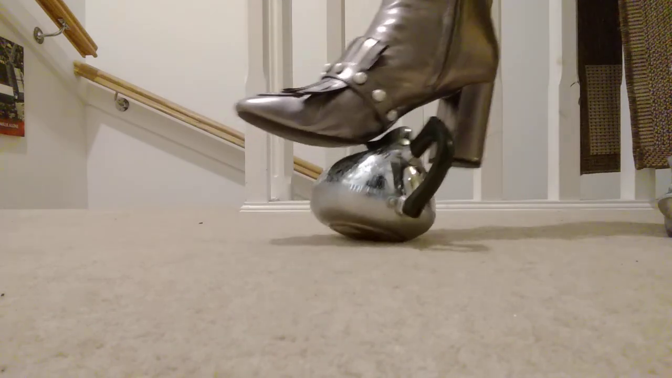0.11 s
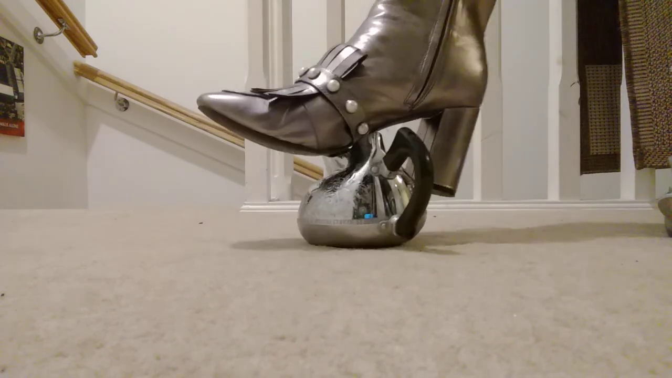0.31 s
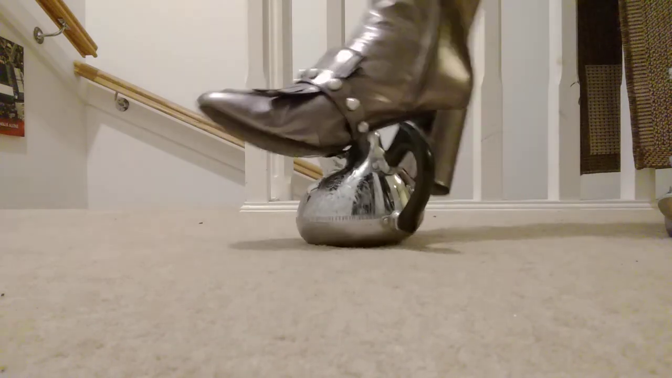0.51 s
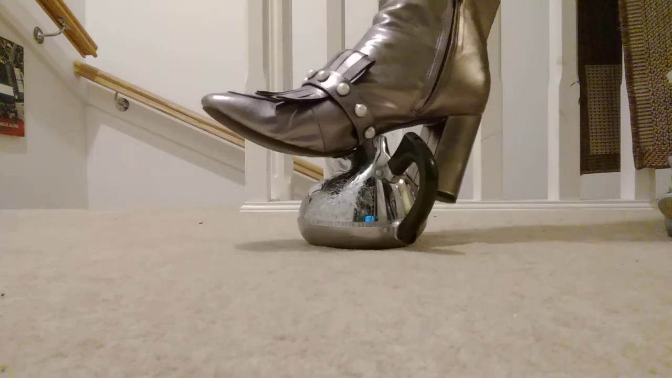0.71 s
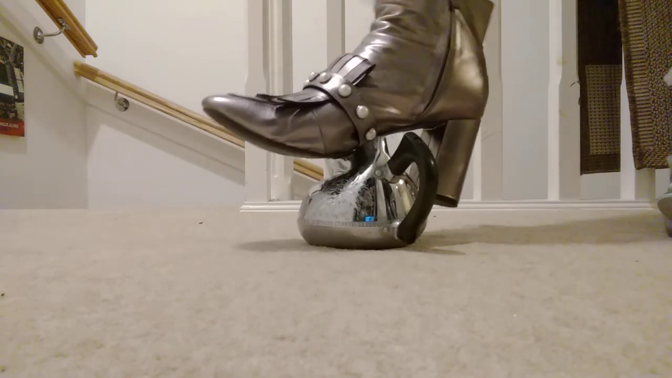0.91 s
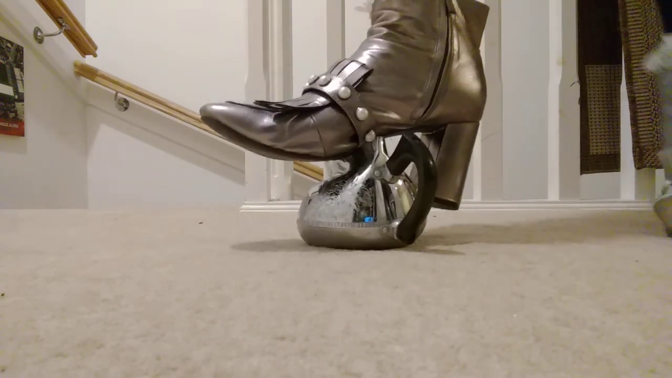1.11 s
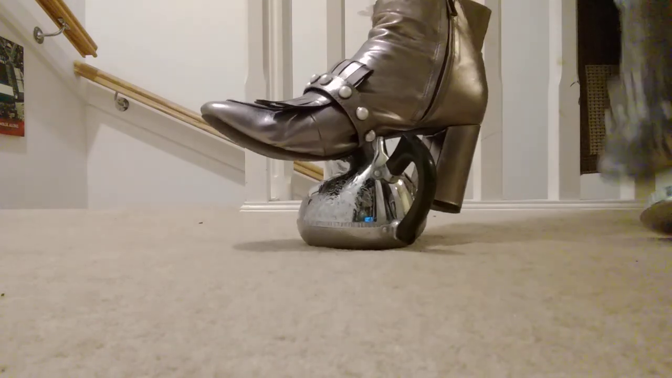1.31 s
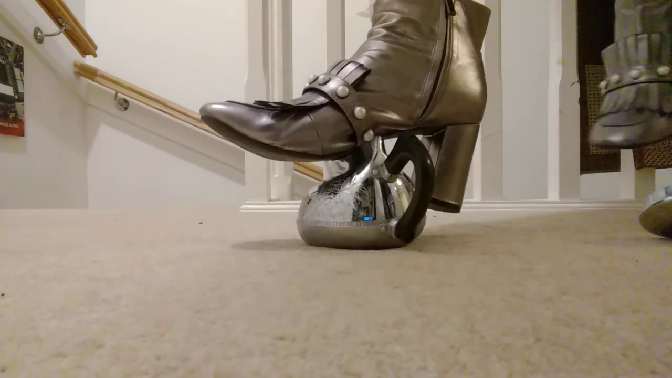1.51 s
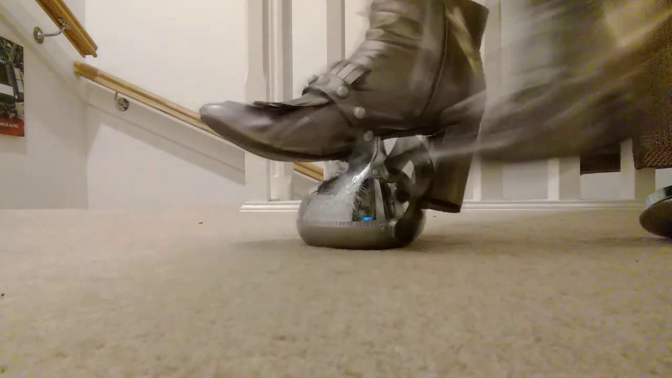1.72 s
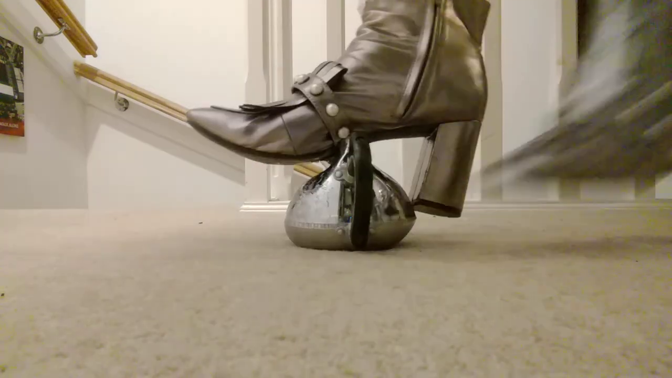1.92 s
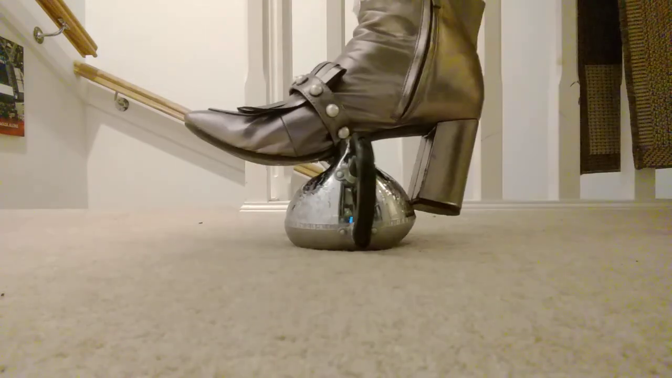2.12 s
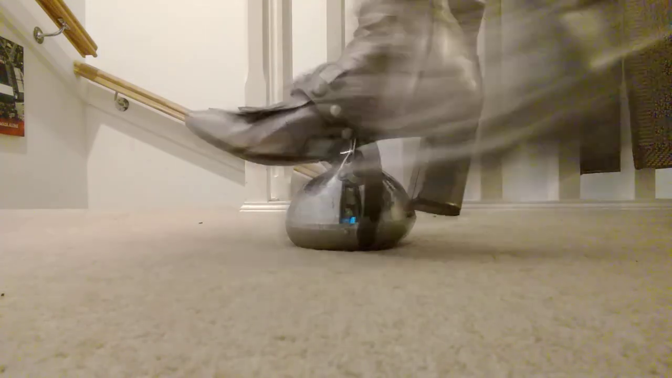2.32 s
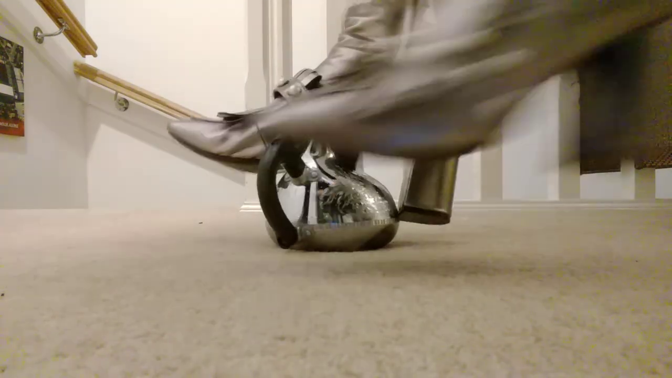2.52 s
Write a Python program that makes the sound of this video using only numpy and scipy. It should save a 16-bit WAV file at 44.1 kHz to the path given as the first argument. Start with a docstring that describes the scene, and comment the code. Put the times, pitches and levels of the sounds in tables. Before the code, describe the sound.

Metallic clank of a boot stamping on a thin steel teapot, then two sharp kicks.

```python
"""Boots on a thin steel teapot

A boot stamps onto a thin steel teapot on a carpeted wooden landing; the other boot kicks it twice.
The pinned pot gives short dull clanks, rattles and rings once: decaying sine modes and noise cracks.
The floor groans under the shifting weight, a sole shuffles, leather scuffs, over hiss: coloured noise.
Two spaced microphone ports low on the carpet pick it up, in a small hallway of sparse random echoes."""
import sys
import numpy as np
from scipy import signal
from scipy.fft import rfft, irfft
from scipy.io import wavfile
from scipy.ndimage import uniform_filter1d

SR = 44100
rng = np.random.default_rng(int(sys.argv[2]) if len(sys.argv) > 2 else 0)


def bounce(signal):
    """Save signal as a 16-bit WAV file at the path given by the first command-line argument."""
    frames = np.transpose(np.atleast_2d(signal))
    limited = np.clip(frames, -1, 1)
    pcm = np.round(limited * 32767).astype(np.int16)
    wavfile.write(sys.argv[1], SR, pcm)


N = 114660

# heavy blows: start_s, level_db, hardness_db_per_octave, crack_db, ring_factor, pitch_factor, thud_lag_s
BLOWS = [(0.2037, -8, -2.5, -4.5, 0.9, 0.947, 0.00066), (1.7147, -4.5, 0.5, -1, 0.7, 1.007, .0055),
         (2.3131, -5, 0.5, -5, 0.7, 1.036, 0.005)]
# light knocks and rattles: start_s, level_db, hardness_db_per_octave, crack_db
TAPS = [(0.1323, -38.5, 6, -3), (0.301, -42.5, 1, -2.5), (0.368, -47, 1.5, -21), (.562, -67, 5, 21),
        (.572, -52, 5, -22), (0.616, -47.5, -8, -26), (1.803, -37.5, -6.5, 3), (1.829, -36.5, -3, -3),
        (1.835, -41.5, -3.5, -11), (1.864, -51.5, 2.8, 5.5), (2.185, -66, -9.5, -31.5)]
# pinned pot and the boards under it, before each blow's factors: pitch_hz, level_db, t60_s
BODY_MODES = [(91, -11.5, 0.18), (146.3, 3, 0.053), (283, 2, 0.03), (357, 6.5, 0.031), (457, 0.5, 0.013),
              (717.4, -4, 0.029), (1129.6, 5.5, 0.0089), (1442, -9, 0.016), (1762, 7.5, 0.0027),
              (2655, -12.5, 0.016), (3680, -22, 0.012)]
# bright noise of steel being struck or scuffed: frequency_hz, level_db
CRACK_SPECTRUM = [(60, -68), (6000, -20), (8500, -18.5), (10500, -4), (12000, 1.5), (13400, -2),
                  (14600, -19.5), (16000, -37)]
# air in the pinned pot, set ringing again and again: start_s, pitch_hz, level_db, t60_s
CAVITY_TONES = [(0.135, 400, -33, 0.13), (.2045, 384.6, -9.5, 0.074), (0.251, 350, -26, 0.045),
                (.314, 356.6, -36.5, 0.15), (0.367, 379, -41, 0.22), (.47, 380.4, -57, 0.5),
                (2.315, 380, -14, .025)]
# a board bending: start_s, pitch_hz, level_db, rise_s, t60_s
CREAKS = [(.778, 150, -43, .03, .4), (.852, 146, -39, .014, .15)]
# freed wall of the pot ringing, before waver and damping: start_s, pitch_hz, level_db, rise_s, t60_s
RIM_TONES = [(1.826, 2100, -51, .006, .07), (1.824, 4619, -55, .03, .1), (1.862, 2040, -51, .008, .05),
             (1.862, 2756, -55, .012, .27), (1.84, 1529, -60, .07, 4.), (1.89, 4619, -58, .03, .15)]
# bass phase of left over right: frequency_hz, phase_radians
BASS_PHASE = [(60, -2.1), (300, -2.2), (450, -.6), (900, .25), (1150, 0)]
# shading of the ports, left minus right: frequency_hz, difference_db
PORT_SHADING = [(150, 6), (400, -2.5), (1200, -2.5), (2500, -0.5), (6000, -2), (13000, -8.5)]
# decay of the hallway: frequency_hz, t60_s
HALL_DECAY = [(60, 0.62), (250, 0.27), (1000, 0.41), (3000, 0.077), (12000, 0.39)]
# colour of the hallway echoes: frequency_hz, level_db
HALL_COLOUR = [(200, -11), (500, -14.5), (1200, -24.5), (3000, -15), (7000, -13.5), (13000, -34)]
# leather scuffing over steel: time_s, level_db
SCUFF_LEVEL = [(.128, -83), (.135, -53), (.23, -43), (.3, -67), (.8, -90), (.86, -53), (.92, -91),
               (1.7, -58), (1.75, -45), (1.79, -95), (1.805, -52), (1.82, -66), (1.861, -52.5),
               (1.899, -83.5), (2.298, -80), (2.321, -38.5), (2.422, -77)]
# sole on carpet, spectrum: frequency_hz, density_db_per_hz
SHUFFLE_SPECTRUM = [(60, -16), (200, -3), (500, -12), (1200, -17.5), (2200, -21), (5000, -38.5)]
# sole on carpet, loudness: time_s, level_db
SHUFFLE_LEVEL = [(.12, -59), (.22, -37.5), (.27, -60), (.33, -66), (.7, -62), (.95, -58.5), (1.06, -54.5),
                 (1.17, -52.5), (1.3, -60.5), (1.68, -62.5), (1.999, -77.5)]
# groaning boards, spectrum: frequency_hz, density_db_per_hz
GROAN_SPECTRUM = [(40, -36.5), (70, -12.5), (95, 1), (145, 0), (200, -9), (380, -18), (900, -39)]
# groaning boards, loudness: time_s, level_db
GROAN_LEVEL = [(0, -53.5), (0.129, -67.5), (0.138, -35.5), (.19, -50), (.45, -60), (.775, -54),
               (0.831, -47), (0.885, -44), (0.901, -63.5), (1.08, -43.5), (1.2, -54), (1.3, -79.5),
               (2, -65)]
# background hiss, spectrum: frequency_hz, density_db_per_hz
HISS_SPECTRUM = [(40, 6), (170, 9.5), (400, -8.5), (1000, -7), (2200, -14), (5000, -12.5), (9500, -13.5),
                 (11500, -5.5), (14300, -7)]
# background hiss, dropping lower after the first kick: time_s, level_db
HISS_LEVEL = [(0, -52.5), (.11, -55.5), (.3, -58), (.79, -58.5), (1.03, -55.5), (1.74, -55.5),
              (1.881, -62.5), (2.11, -65.5)]

BOARDS_HZ = 648  # modes below this arrive late
SWELL_CYCLES = 0.89  # cycles that a mode takes to build up
CRACK_RISE_S, CRACK_T60_S = .0006, .007
CRACK_TAIL_DB, CRACK_TAIL_T60_S = -19, .035
TAP_RING_FACTOR = 0.83
# dented steel settling after a blow
RATTLE_COUNT, RATTLE_S, RATTLE_CRACK_DB = 14, .16, -19.5
RATTLE_DB, RATTLE_FADE_DB_PER_S, RATTLE_SPREAD_DB = -32, -130, 10
CAVITY_RISE_S = 0.0058
# lid chattering on the rim
CLATTER_COUNT, CLATTER_START_S, CLATTER_LENGTH_S = 70, 1.8, .065
CLATTER_RANGE_HZ, CLATTER_DB, CLATTER_T60_S = (3100, 9000), -68, .045
WAVER_DB, WAVER_S = 1.8, .012  # uneven swelling of the thin tones
RIM_DAMPED_S, RIM_DAMP_DB_PER_S, RIM_DAMPING_S = 2.01, -300, .055  # the carpet catches the pot again
PORT_DELAY_S = .000425
NOISE_TOP_HZ = 14400
BASS_CUT_HZ, EDGE_HZ = 122, 16000


def gain_of(db):
    """Decibels to an amplitude factor."""
    return 10 ** (np.asarray(db) / 20)


def evened(x):
    """Scales a sound to unit RMS."""
    return x / np.sqrt(np.mean(x ** 2) + 1e-20)


def read(points, hz):
    """Reads a frequency table between its points on a log-frequency axis."""
    f, value = np.transpose(points)
    return np.interp(np.log(hz + 1), np.log(f + 1), value)


def follow(curve):
    """Turns a level table into a gain for each sample."""
    return gain_of(np.interp(np.arange(N) / SR, *np.transpose(curve)))


def smoothed_noise(noise, span):
    """Slow random wander at unit RMS: noise averaged twice over a span of samples."""
    return evened(uniform_filter1d(uniform_filter1d(noise, span), span))


def add(mix, start_s, sound):
    """Lays a sound into the mix in place, cut at the end."""
    part = mix[round(start_s * SR):][:len(sound)]
    part += sound[:len(part)]


def coloured(x, points, top_hz=None):
    """Filters along the last axis by a spectrum table."""
    size = x.shape[-1]
    hz = np.fft.rfftfreq(size, 1 / SR)
    below_top = hz < (top_hz or SR)
    return irfft(rfft(x) * gain_of(read(points, hz)) * below_top, size)


def hit(level_db, hard_db, crack_db, ring, pitch, lag_s, noise):
    """A bright crack and the pot modes, then the thud of the boards; low modes swell in slowly."""
    t = np.arange(len(noise)) / SR
    hz, db, t60 = np.transpose(BODY_MODES)[:, :, None]
    age = np.maximum(t - lag_s / (1 + (hz / BOARDS_HZ) ** 4), 0)
    rise = np.sin(np.pi / 2 * np.minimum(age * hz / SWELL_CYCLES, 1)) ** 2
    # a harder contact tilts the modes toward the treble, around 400 Hz
    mode_db = db + hard_db * np.log2(hz / 400) - 60 * age / (ring * t60)
    modes = gain_of(mode_db) * rise * np.sin(2 * np.pi * hz * pitch * age)
    fade = gain_of(-60 * t / CRACK_T60_S) + gain_of(CRACK_TAIL_DB - 60 * t / CRACK_TAIL_T60_S)
    attack = np.minimum(t / CRACK_RISE_S, 1)
    crack = evened(coloured(noise, CRACK_SPECTRUM)) * fade * attack
    return gain_of(level_db) * (modes.sum(0) + gain_of(crack_db) * crack)


def rattle(out, blow_s, blow_db):
    """Dented steel settling: small hits crowd in just after a blow and fade with time."""
    for when, size, pitch in rng.random(size=(RATTLE_COUNT, 3)):
        late_s = RATTLE_S * (when ** 2 + .1)
        db = blow_db + RATTLE_DB + RATTLE_FADE_DB_PER_S * late_s
        db += RATTLE_SPREAD_DB * (2 * size - 1)
        noise = rng.standard_normal(4096)
        sound = hit(db, 0, RATTLE_CRACK_DB, TAP_RING_FACTOR, .75 + pitch / 2, 0, noise)
        add(out, blow_s + late_s, sound)


def pot():
    """All blows on the steel, the loose rattle after each, and the taps."""
    out = np.zeros(N)
    for start_s, level_db, *row in BLOWS:
        add(out, start_s, hit(level_db, *row, rng.standard_normal(8192)))
        rattle(out, start_s, level_db)
    for start_s, *row in TAPS:
        pitch = rng.uniform(0.92, 1.2)
        add(out, start_s, hit(*row, TAP_RING_FACTOR, pitch, 0, rng.standard_normal(8192)))
    return out


def tone(hz, db, rise_s, t60):
    """One sine mode that builds up and dies away, cut at 0.8 s."""
    t = np.arange(0, .8, 1 / SR)
    rise = np.minimum(t / rise_s, 1)
    fade = gain_of(db - 60 * np.maximum(t - rise_s, 0) / t60)
    return rise * fade * np.sin(2 * np.pi * hz * t)


def lid_clatter(wall):
    """Lid chattering on the rim: a burst of tiny tones, crowded toward the low end of their range."""
    for when, pitch in rng.random(size=(CLATTER_COUNT, 2)):
        hz = np.interp(pitch ** 2, (0, 1), CLATTER_RANGE_HZ)
        start_s = CLATTER_START_S + CLATTER_LENGTH_S * when
        add(wall, start_s, tone(hz, CLATTER_DB, CAVITY_RISE_S, CLATTER_T60_S))


def ringing():
    """Thin tones of the cavity, a board and the wall; the wall and lid waver, then are damped."""
    steady, wall = np.zeros((2, N))
    for start_s, hz, db, t60 in CAVITY_TONES:
        add(steady, start_s, tone(hz, db, CAVITY_RISE_S, t60))
    for start_s, *row in CREAKS:
        add(steady, start_s, tone(*row))
    for start_s, *row in RIM_TONES:
        add(wall, start_s, tone(*row))
    lid_clatter(wall)
    waver = smoothed_noise(rng.standard_normal(N), round(WAVER_S * SR))
    damping_time = np.clip(np.arange(N) / SR - RIM_DAMPED_S, 0, RIM_DAMPING_S)
    return steady + wall * gain_of(RIM_DAMP_DB_PER_S * damping_time + WAVER_DB * waver)


def ports(x):
    """One wave at both ports: the left one later, the right one with its own bass phase; each shaded."""
    hz = np.fft.rfftfreq(N, 1 / SR)
    # the delay's phase starts where the bass phase table ends
    late = np.exp(-2j * np.pi * PORT_DELAY_S * np.maximum(hz - BASS_PHASE[-1][0], 0))
    half_shading = gain_of(read(PORT_SHADING, hz) / 2)
    left = half_shading * late
    right = np.exp(-1j * read(BASS_PHASE, hz)) / half_shading
    return irfft(rfft(x) * np.array([left, right]), N)


def hall(x):
    """Sparse random taps, each band dying at its own speed; partly shared by the ports."""
    taps = np.zeros((3, SR))
    # one tap at a random place in every 20 samples, of random sign
    at = np.arange(260, SR - 20, 20) + rng.integers(0, 20, (3, (SR - 261) // 20))
    np.put_along_axis(taps, at, rng.choice([-1., 1.], at.shape), 1)
    hz, t, bands = signal.stft(taps, SR, nperseg=256)
    decay = gain_of(-60 * t / read(HALL_DECAY, hz)[:, None])
    tail = signal.istft(bands * decay, SR, nperseg=256)[1]
    wet = signal.fftconvolve(x[None], tail / np.linalg.norm(tail[0]), axes=1)[:, :N]
    return coloured(0.94 * ports(wet[2]) + 0.85 * wet[:2], HALL_COLOUR)


def hall_echoes(knocks):
    """Separate random hallway echoes for each stretch that begins with a heavy blow."""
    later_blows = [start_s for start_s, *_ in BLOWS[1:]]
    # the first stretch also takes in what comes before its blow
    stretch = np.searchsorted(later_blows, np.arange(N) / SR, "right")
    return sum(hall(knocks * (stretch == k)) for k in range(len(BLOWS)))


def background(points, curve, same, lumpy_db, lump=500):
    """Coloured noise on a lumpy level curve; "same" is the amplitude common to both ports."""
    noise = rng.standard_normal((4, N))
    pair = same * ports(noise[2]) + np.sqrt(1 - same ** 2) * noise[:2]
    lumps = gain_of(lumpy_db * smoothed_noise(noise[3], lump))
    return evened(coloured(pair, points, NOISE_TOP_HZ)) * follow(curve) * lumps


def scene():
    """Knocks and ringing reach both ports, with the hall's echoes of the knocks and four noise beds."""
    knocks = pot()
    echoes = hall_echoes(knocks)
    hiss = background(HISS_SPECTRUM, HISS_LEVEL, same=.88, lumpy_db=0.48)
    groan = background(GROAN_SPECTRUM, GROAN_LEVEL, same=.75, lumpy_db=1.5)
    shuffle = background(SHUFFLE_SPECTRUM, SHUFFLE_LEVEL, same=1.0, lumpy_db=1.8)
    scuff = background(CRACK_SPECTRUM, SCUFF_LEVEL, same=.8, lumpy_db=3.5, lump=150)
    return ports(knocks + ringing()) + echoes + hiss + groan + shuffle + scuff


def record(dry):
    """The microphone's bass cut, then the band limit."""
    bass_cut = signal.butter(2, BASS_CUT_HZ, "high", fs=SR, output="sos")
    thin = signal.sosfilt(bass_cut, dry)
    band_limit = signal.firwin(511, EDGE_HZ, window=("kaiser", 9), fs=SR)
    return signal.oaconvolve(thin, band_limit[None], "same")


dry = scene()
out = record(dry)
bounce(out)
```